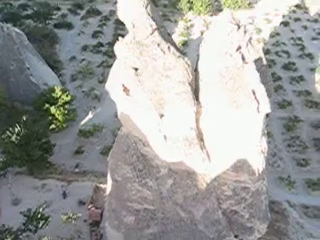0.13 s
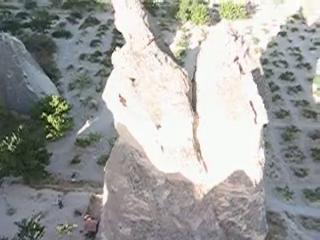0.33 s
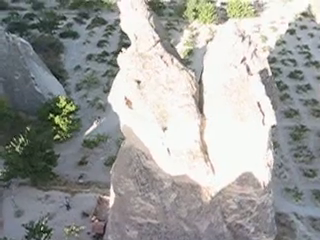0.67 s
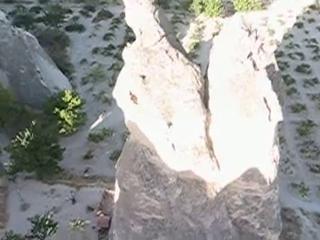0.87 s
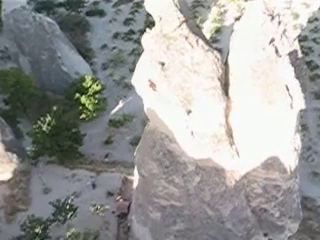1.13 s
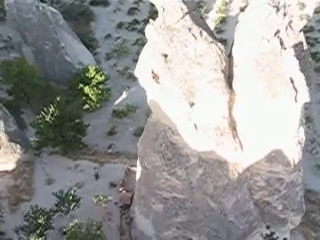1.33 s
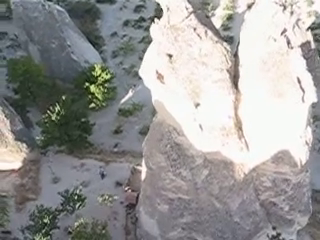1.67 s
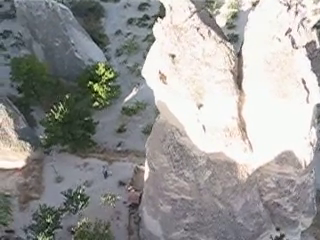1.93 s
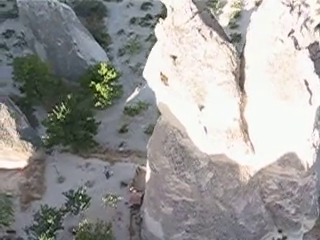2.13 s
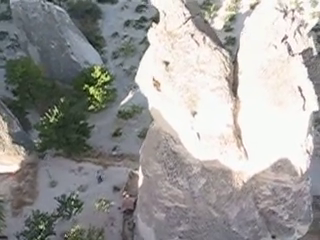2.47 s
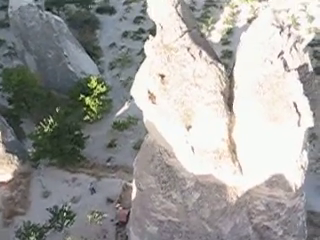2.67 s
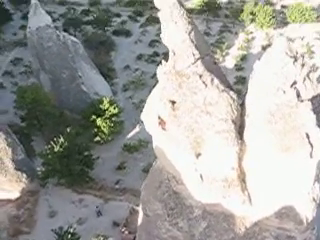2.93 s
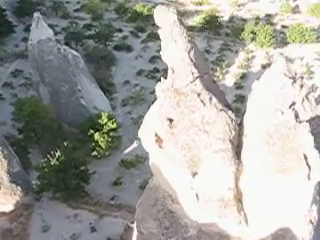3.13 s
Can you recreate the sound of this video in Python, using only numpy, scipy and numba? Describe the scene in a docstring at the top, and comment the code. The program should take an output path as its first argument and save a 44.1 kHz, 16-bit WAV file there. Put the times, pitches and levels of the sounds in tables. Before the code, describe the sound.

Propane burner roar cuts in suddenly close overhead and never stops; low turbulent rumble, fine gas hiss and faint whistle, a small late sputter, then brighter hiss; dry open air, squashed dull recorder sound.

```python
"""Hot-air balloon burner

A propane burner roars just above the basket, cutting in at full blast. Turbulent eddies are noise with
fluttering level, coloured by the burner's broad resonances; the gas jet is grainy hiss with a faint unsteady
whistle. Metal ticks early and one late sputter are decaying noise bursts. Near the end the whole sound turns
brighter. A small recorder holds the peaks down and cuts the top."""
import sys
import numpy as np
from scipy import signal
from scipy.fft import rfft, irfft, next_fast_len
from scipy.io import wavfile
from scipy.ndimage import uniform_filter1d, map_coordinates
from numba import njit

SR = 44100
rng = np.random.default_rng(int(sys.argv[2]) if len(sys.argv) > 2 else 0)


def bounce(signal):
    """Save signal as a 16-bit WAV file at the path given by the first command-line argument."""
    frames = np.transpose(np.atleast_2d(signal))
    limited = np.clip(frames, -1, 1)
    pcm = np.round(limited * 32767).astype(np.int16)
    wavfile.write(sys.argv[1], SR, pcm)


N = 145089

# broad resonances around the burner: (centre [Hz], width [Hz], lift [dB])
BURNER_RESONANCES = [(186, 54, 3.5), (285.4, 42, 6), (330, 28, 4), (444, 70, 5), (580, 38, 3), (806, 24, 5),
                     (893, 65, 4), (1083, 99, 5.5), (1225, 16, 1), (1600, 70, 2.5), (2020, 140, 3.5),
                     (2220, 120, 4.5), (3300, 100, 3.5), (3800, 88, 1.5), (4420, 250, 4), (4810, 170, 2.5),
                     (5110, 160, 0)]


def undb(db):
    """Decibels to gain."""
    return 10 ** (np.asarray(db) / 20)


def unit(x):
    """Scale to rms 1."""
    return x / np.sqrt(np.mean(x ** 2))


def curve(table):
    """Each column of a table as a line through time."""
    rows = np.array(table, float).T
    t = np.arange(N) / SR
    return [np.interp(t, rows[0], col) for col in rows[1:]]


def colour(x, points, peaks=()):
    """Filter by (frequency [Hz], gain [dB]) points, with bell-shaped resonances on top."""
    size = next_fast_len(N)
    f_hz = np.maximum(np.fft.rfftfreq(size, 1 / SR), 1)
    point_hz, point_db = np.array(points, float).T
    gain_db = np.interp(np.log(f_hz), np.log(point_hz), point_db)
    for centre_hz, width_hz, lift_db in peaks:
        gain_db = gain_db + lift_db * np.exp(-2 * ((f_hz - centre_hz) / width_hz) ** 2)
    return irfft(rfft(x, size) * undb(gain_db), size)[:N]


def ring_twice(x, hz, width_hz):
    """Two equal resonators in series."""
    b, a = signal.iirpeak(hz, hz / width_hz, fs=SR)
    return signal.lfilter(b, a, signal.lfilter(b, a, x))


def noise():
    """White noise."""
    return rng.standard_normal(N)


def walk(rate_per_s):
    """Smooth random curve through rate_per_s new values a second; rms 1."""
    position = np.arange(N) / SR * rate_per_s
    return unit(map_coordinates(rng.standard_normal(4096), [position], order=3, mode="mirror"))


def burst(start_s, decay_s):
    """Sudden rise and exponential fall."""
    age_s = np.arange(N) / SR - start_s
    return (age_s >= 0) * np.exp(-np.maximum(age_s, 0) / decay_s)


@njit
def follow(x, release):
    """Peak follower: instant rise, slow fall."""
    out, e = np.empty(len(x)), 0.
    for i in range(len(x)):
        e = max(abs(x[i]), e * release)
        out[i] = e
    return out


def flutter():
    """Level flutter [dB] of the burner: slow surges plus quick puffs."""
    surge_per_s, surge_rms_db = 47, .5
    puff_per_s, puff_rms_db = 120, 1.45
    return surge_rms_db * walk(surge_per_s) + puff_rms_db * walk(puff_per_s)


def flame(flutter_db, level_db):
    """Turbulent combustion: the roar puffs with the eddies, its deep rumble is steadier."""
    # roar spectrum: (frequency [Hz], relative density [dB per Hz])
    roar_spectrum = [(12, -16), (30, -3.5), (58, 0), (110, -2), (160, -1.5), (240, -5), (385, -9.5),
                     (540, -12.5), (730, -15.5), (980, -19.5), (1220, -21.5), (1390, -27), (1510, -43.5),
                     (2500, -55.5)]
    rumble_hz, trim_db = 220, 6
    flutter_share, swell_share = 0.41, 0.56  # of the dB swings, in the rumble
    mean_db = np.mean(level_db)
    swell_db = level_db - mean_db
    eddies = noise()
    lowpass = signal.butter(2, rumble_hz, fs=SR, output="sos")
    deep = signal.sosfiltfilt(lowpass, eddies)
    rumble = deep * undb(flutter_share * flutter_db + swell_share * swell_db)
    puffs = (eddies - deep) * undb(flutter_db + swell_db)
    return undb(trim_db + mean_db) * unit(colour(rumble + puffs, roar_spectrum, BURNER_RESONANCES))


def gas_hiss(flutter_db, level_db):
    """Gas hisses from the nozzles with a fine grain, sharing most of the flame's flutter."""
    # hiss spectrum: (frequency [Hz], relative density [dB per Hz])
    hiss_spectrum = [(700, -9), (1500, -1), (1700, -2.5), (1850, 2.5), (2100, 0), (2530, -1.5), (2770, 3.5),
                     (2980, 1.5), (3400, -4), (3650, -6), (4150, -7.5), (4700, -7), (5270, -4.5),
                     (5450, -7), (6300, -14.5)]
    flutter_share, grain_rms_db, grain_per_s = .8, 0.5, 500
    stream = noise() * undb(flutter_share * flutter_db + grain_rms_db * walk(grain_per_s))
    return undb(level_db) * unit(colour(stream, hiss_spectrum, BURNER_RESONANCES))


def jet_whistle():
    """The jet's faint whistle: narrow-band noise of wavering level."""
    # whistle level: (time [s], level [dB])
    whistle_level = [(.07, -46), (.25, -53), (.55, -50.5), (.75, -47), (1.05, -50), (1.23, -45.5),
                     (1.5, -54.5), (2.3, -53.5), (2.85, -50), (3.0, -64.5)]
    hz, width_hz = 3040, 160  # width of each resonator
    waver_rms_db, waver_per_s = 1, 25
    tone = ring_twice(noise(), hz, width_hz)
    wavering = unit(tone * undb(waver_rms_db * walk(waver_per_s)))
    return wavering * undb(curve(whistle_level)[0])


def metal_ticks():
    """Light metallic ticks: resonant noise dying away in milliseconds."""
    # ticks: (time [s], level [dB])
    tick_events = [(0.228, -39), (0.25, -32.5)]
    hz, width_hz, decay_s = 3030, 700, 0.0059
    metal = unit(ring_twice(noise(), hz, width_hz))
    return metal * sum(undb(db) * burst(start_s, decay_s) for start_s, db in tick_events)


def sputter():
    """One short sputter of the flame: a coloured noise burst."""
    # the sputter: (time [s], level [dB], decay [s])
    start_s, level_db, decay_s = (2.903, -31.5, 0.0044)
    spectrum = [(300, -7), (1200, 0.5), (3000, -16.5), (5200, -1), (7000, -30)]  # (Hz, dB)
    return unit(colour(noise(), spectrum)) * undb(level_db) * burst(start_s, decay_s)


def brighten(burner):
    """Crossfade to a brighter colour near the end."""
    # change of colour: (frequency [Hz], gain [dB])
    bright_colour = [(60, 0), (290, 1), (640, -0.5), (820, 1), (1130, -2.5), (1350, 2), (1550, 8.5),
                     (1730, 6), (1900, -0.5), (2150, 2), (2500, 2.5), (3100, -5), (3400, -2.5), (3850, 5.5),
                     (4550, -2), (5150, 4), (5700, 1.5)]
    start_s, rise_s = 2.84, 0.11
    share = np.clip((np.arange(N) / SR - start_s) / rise_s, 0, 1)
    return (1 - share) * burner + share * colour(burner, bright_colour)


def scene():
    """Flame and hiss share one flutter; everything cuts in at once."""
    # burner level: (time [s], roar level before trim [dB], hiss level [dB])
    burner_level = [(.08, -23, -39), (.17, -20, -41.5), (.21, -23.5, -40), (.26, -21.5, -41.5),
                    (.38, -22.5, -41.5), (.41, -24.5, -45.5), (.48, -24.5, -43), (.53, -24.5, -44),
                    (.6, -23, -43.5), (.69, -21.5, -42), (.82, -23.5, -44), (1.0, -22, -42),
                    (1.25, -24, -42), (1.46, -21.5, -38.5), (1.555, -22, -44), (1.585, -24.5, -39.5),
                    (1.63, -22.5, -42.5), (1.68, -24.5, -44), (1.73, -22, -41.5), (1.9, -23, -40.5),
                    (2.14, -22, -40.5), (2.2, -24, -42.5), (2.33, -22.5, -40), (2.39, -24.5, -43.5),
                    (2.54, -23, -40.5), (2.58, -23.5, -40.5), (2.65, -21.5, -42), (2.84, -24, -41),
                    (2.93, -26, -41), (3.07, -22.5, -36.5), (3.12, -25.5, -40), (3.22, -22, -37),
                    (3.29, -22.5, -38.5)]
    start_s = .0722
    roar_db, hiss_db = curve(burner_level)
    flutter_db = flutter()
    burner = flame(flutter_db, roar_db) + gas_hiss(flutter_db, hiss_db) + jet_whistle()
    mix = brighten(burner) + metal_ticks() + sputter()
    return (mix * (np.arange(N) / SR >= start_s))[None]


def record(dry):
    """A fast limiter holds the peaks; a steep low-pass cuts the top."""
    drive_db, limit_db, release_s, top_hz = .5, -8.5, 0.011, 5600
    x = dry[0] * undb(drive_db)
    peak = follow(x, np.exp(-1 / (release_s * SR)))
    gain = (1 + (peak / undb(limit_db)) ** 8) ** (-1 / 8)  # soft knee
    held = x * uniform_filter1d(gain, size=40)
    lowpass = signal.ellip(8, .3, 80, top_hz, fs=SR, output="sos")
    return signal.sosfilt(lowpass, held)[None]


dry = scene()
out = record(dry)
bounce(out)
```